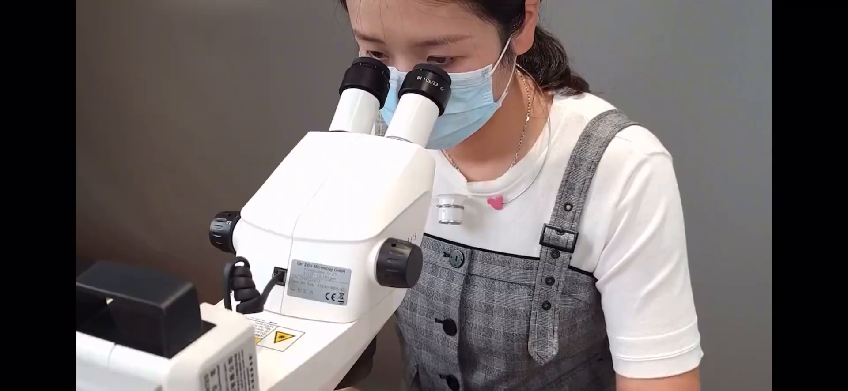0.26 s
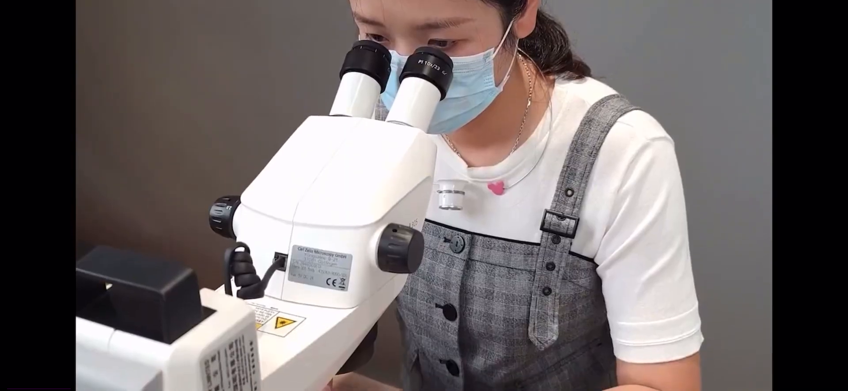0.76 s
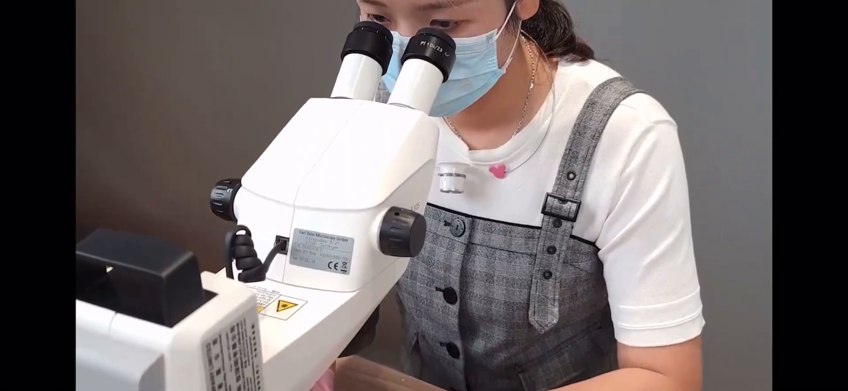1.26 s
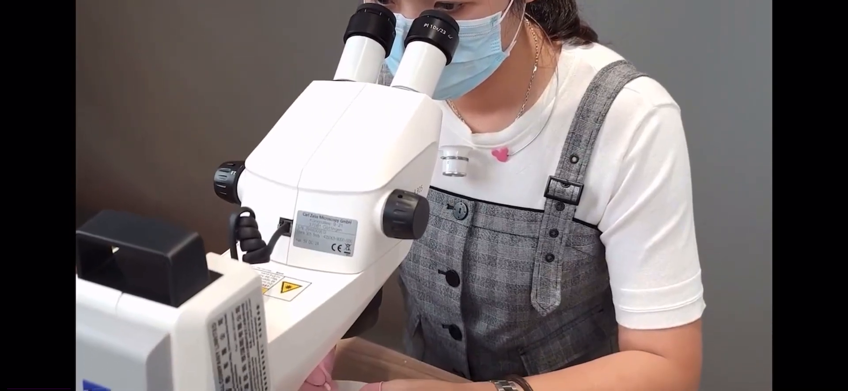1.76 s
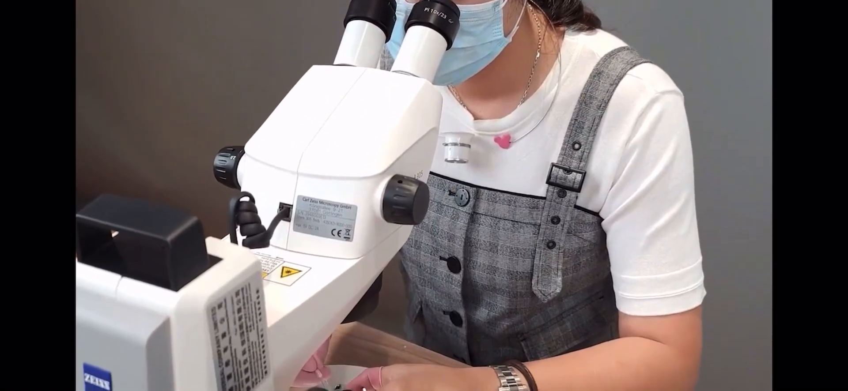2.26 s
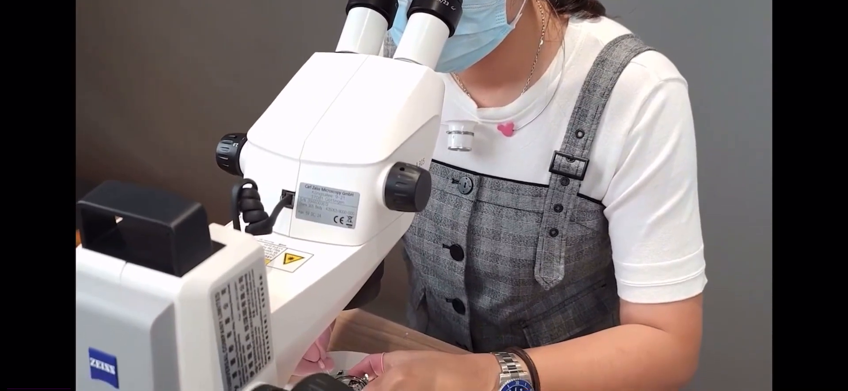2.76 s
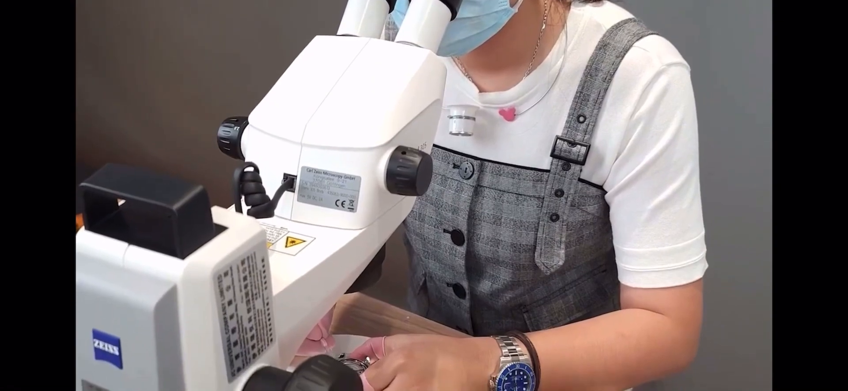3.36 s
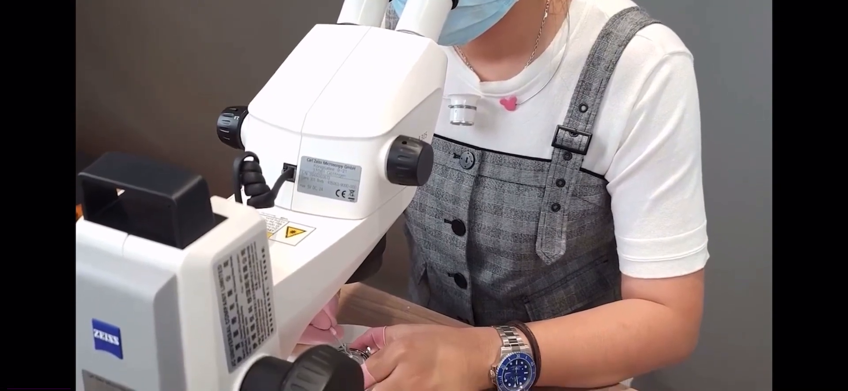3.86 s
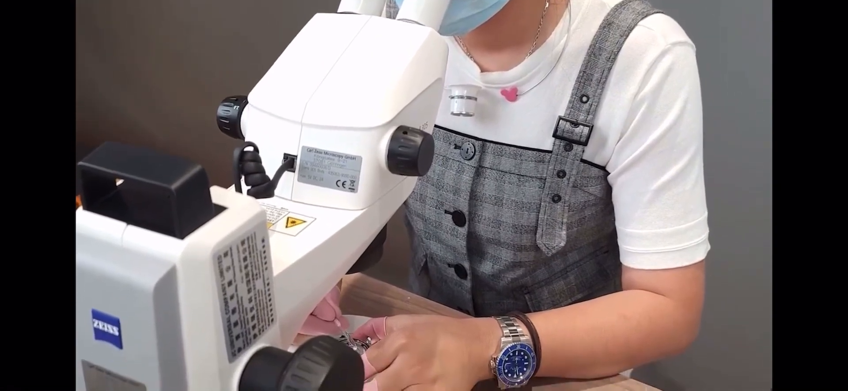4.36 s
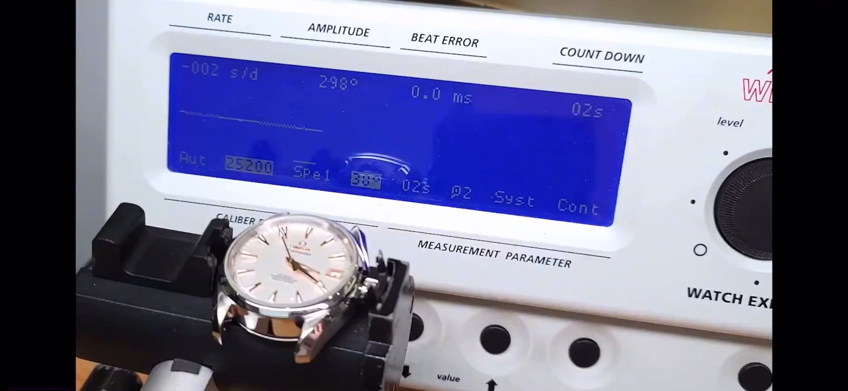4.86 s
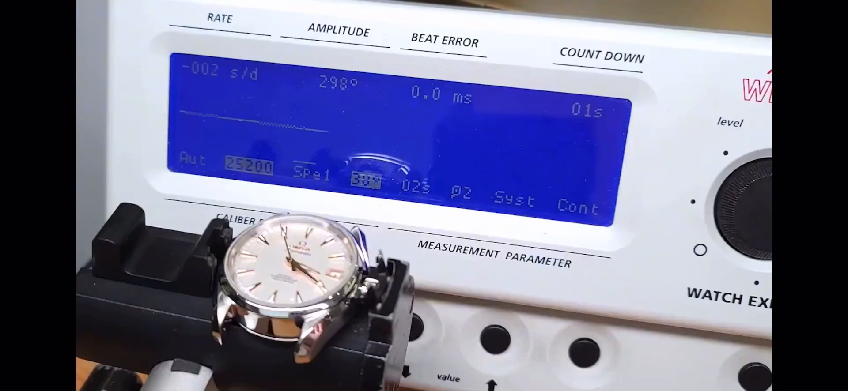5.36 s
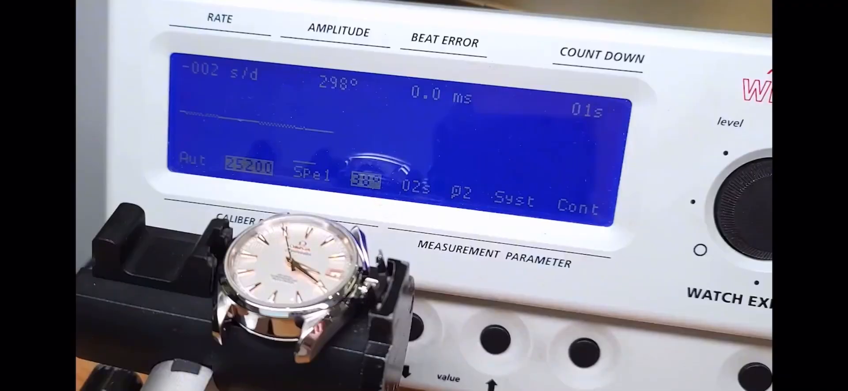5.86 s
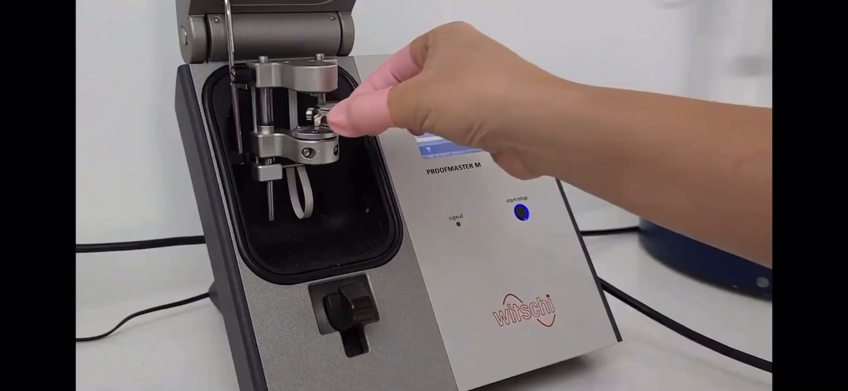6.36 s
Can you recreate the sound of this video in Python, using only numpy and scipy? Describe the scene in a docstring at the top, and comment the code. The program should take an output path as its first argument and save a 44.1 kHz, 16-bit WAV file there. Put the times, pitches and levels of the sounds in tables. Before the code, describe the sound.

A quiet bed of night insects and low rumble, in wide stereo. A close cricket in the centre gives several crisp chirps in the second and third seconds, while fainter ones keep pulsing on the left. Then much louder, steady rapid watch ticks, high, hard and uneven in strength, play from a loudspeaker in a reverberant workshop. They cut out suddenly, leaving crickets, airy hush and small metal contacts.

```python
"""Crickets sing throughout over low rumble; late on, a watch ticks seven times a second, then small clicks.
The mechanical watch sounds through the loudspeaker of a timing machine in a workshop: each beat is a
cluster of steel-on-jewel blows that ring damped case modes, followed by reflections and reverberation.
The close chirper and four farther ones are trains of wing strokes; a low trill and thin tones are wavering
sines. A distant chorus, the night's rumble and hiss and the room's air are noise; soft low blips are added."""
import sys
import numpy as np
from scipy import signal
from scipy.fft import rfft, irfft, next_fast_len
from scipy.io import wavfile
from scipy.ndimage import uniform_filter1d, map_coordinates

SR = 44100
rng = np.random.default_rng(int(sys.argv[2]) if len(sys.argv) > 2 else 0)


def log_audio(samples):
    """Write samples as a 16-bit WAV file to the path given in sys.argv[1]."""
    # one column per channel
    frames = np.atleast_2d(samples).T
    # limit to full scale, then quantise
    limited = np.clip(frames, -1, 1)
    pcm = np.round(limited * 32767).astype(np.int16)
    wavfile.write(sys.argv[1], SR, pcm)


def volts(x):
    """Linear amplitude factor 10**(x/20) for a level x in dB, scalar or array-like."""
    e = np.asarray(x, float) / 20
    return 10 ** e


N = 291060  # length in samples

# beat just before the watch is heard, whose reverberation is still dying then: start_s, level_db
EARLIER_BEAT = (4.516, -5.5)
# drop of the escape wheel and its rebound:
# start_s, level_db, rebound_after_ms, rebound_level_db, low_modes_db
DROPS = [(4.658, -16.5, 1.7, -16, -2), (4.801, -8.5, 1.7, -14.5, 1), (4.943, -17, 1.4, -13, 4),
         (5.0861, -11.5, 1.8, -15, 0.8), (5.2297, -14.5, 1.2, -15.5, 2.5), (5.3722, -8.5, 2.1, -12.5, -4.5),
         (5.516, -5, .9, -15, -8.5), (5.6573, -14.5, 2.2, -11, -2.5), (5.8019, -11.5, 1.4, -22.5, 2.5),
         (5.9432, -11.5, 1.7, -10, -1.3), (6.0865, -14.5, 1.01, -13.5, 3.5), (6.2288, -7.5, 1.7, -13, 2.5)]
LOW_MODES_HZ = 6600  # modes under this ring more in some beats and less in others


def watch():
    """Superposition: each beat sounds direct, off the bench and through the room, in the stretch it is heard."""
    # stretch in which the watch is heard: start_s, end_s
    watch_heard = (4.568, 6.337)
    low_in_room = 0.8  # share of the low-mode change that reaches the room
    direct, blows, spread = np.zeros(N), np.zeros(N), np.zeros((2, N))
    for s, level_db, low_db in contacts():
        add(direct, s - 0.0002, contact(level_db + 2.0, low_db))
        blows[round(s * SR)] = volts(0.91 * level_db)  # the room grows less than the direct click

    step = SR // 7  # one beat
    first = round(EARLIER_BEAT[0] * SR) - step // 4
    for k, low_db in enumerate([0, *np.transpose(DROPS)[-1]]):
        start = first + k * step
        beat = slice(start, start + step)
        add(spread, start / SR + 0.0035, volts(3.5) * room(blows[beat], low_in_room * low_db))
        add(spread, start / SR, click_width(direct[beat]))
        add(spread, start / SR + 0.0006, volts(-13.5) * bench(direct[beat]))

    t = np.arange(N) / SR
    to_edge_s = np.minimum(t - watch_heard[0], watch_heard[1] - t)
    gate = np.clip(to_edge_s / 0.0015, 0, 1)
    return gate * (direct + spread)


def contacts():
    """An isochronous balance: rows (s, dB, low modes dB) of lead-ins on the even beat, drops, rebounds, bounces."""
    # small contacts ahead of each beat, unlocking and impulse: from_even_beat_ms, level_db
    lead_ins = [(-5, -28.5), (-3.1, -27), (-2.6, -32.5)]
    # bounces, timed from the drop: after_drop_ms, relative_to_rebound_db
    bounces = [(3.4, -5), (5.2, -18.5)]
    beat_s, first_beat_s = 1 / 7, 4.6578  # the balance swings evenly
    loose_ms, loose_db = 0.5, 2  # scatter of the small contacts
    firm, small = [(*EARLIER_BEAT, 0)], []
    for k, (s, level_db, after_ms, rebound_db, low_db) in enumerate(DROPS):
        firm.append((s, level_db, low_db))
        firm.append((s + after_ms / 1000, rebound_db, low_db))
        even_s = first_beat_s + k * beat_s
        small += [(even_s + ms / 1000, lead_db, 0) for ms, lead_db in lead_ins]
        small += [(s + ms / 1000, rebound_db + rel_db, low_db) for ms, rel_db in bounces]
    scatter = rng.standard_normal((len(small), 3)) * [loose_ms / 1000, loose_db, loose_db]
    return [*firm, *(np.array(small) + scatter)]


def contact(peak_db, low_db):
    """Modal synthesis: a steel-on-jewel blow swells in and rings damped case modes at new strengths."""
    # watch case, pickup and loudspeaker: frequency_hz, width_hz, mode_level_db
    case_modes = [(5453, 100, -15), (5475, 240, -6), (5870, 180, -9.5), (6350, 230, -19), (7200, 270, -17),
                  (7580, 290, -2.5), (7980, 450, 1.5), (8640, 300, -3.5), (9180, 450, -16),
                  (9990, 110, -9.5), (10000, 200, -20.5), (10810, 230, -11.5), (11670, 520, -7.5),
                  (12100, 270, -8.5), (14520, 180, -9.5), (15400, 250, -44)]
    t = np.arange(1024) / SR
    hz, width, mode_db = np.transpose(case_modes)[..., None]
    luck = rng.standard_normal((2, len(case_modes), 1))
    strength = width * volts(mode_db + low_db * (hz < LOW_MODES_HZ) + 2.3 * luck[0])
    decay = np.exp(-np.pi * width * t)  # a wider resonance dies faster
    modes = strength * decay * np.sin(2 * np.pi * hz * t + 1.84 * luck[1])
    swell = 1 - np.exp(-(t / 0.00053) ** 2)
    ring = modes.sum(axis=0) * swell
    # loudspeaker band
    ring = filtered(ring, lambda f: 1 / (1 + (4500 / (f + 1)) ** 10) / (1 + (f / 15600) ** 40))
    return volts(peak_db) * ring / np.abs(signal.hilbert(ring)).max()


def bench(direct):
    """Early reflection: chatter and near reflections are a short noise tail, largely alike on both sides."""
    t = np.arange(SR // 16) / SR
    noise = rng.standard_normal(len(t)) + 0.41 * rng.standard_normal((2, len(t)))
    tail = noise * volts(-60 * t / 0.031)
    return signal.fftconvolve(direct[None], tail / np.linalg.norm(tail[0]), axes=1)


def click_width(direct):
    """Stereo width: a very short noise tail in opposite phase makes the two sides of each click unlike."""
    # strength of the unlike part: frequency_hz, level_db
    unlike_part = [(5500, -11), (6900, -19), (9000, -19), (10500, -13), (12500, -11), (15000, -9.5)]
    t = np.arange(SR // 16) / SR
    tail = rng.standard_normal(len(t)) * volts(-60 * t / 0.003)
    unlike = signal.fftconvolve(direct, tail / np.linalg.norm(tail))
    return filtered(unlike, lambda hz: volts(along(unlike_part, hz))) * [[1], [-1]]


def room(blows, low_db):
    """Reverberation: a new noise tail dies band by band, with random uneven patches in time and frequency."""
    # smooth colour of the sound the loudspeaker spreads through the room: frequency_hz, density_db_per_hz
    spread_colour = [(4300, -50), (4900, -10), (5600, 1), (6100, -4), (6700, -9), (7600, 1), (8600, -4),
                     (9600, -10.5), (11500, -12.5), (13000, -15), (13700, -16.5), (14400, -15),
                     (14800, -29), (15100, -62.5)]
    # reverberation time: frequency_hz, t60_s
    decay_times = [(5000, 0.37), (8000, 0.64), (14000, 0.87)]
    hz, t, bands = signal.stft(rng.standard_normal((3, SR // 2)), SR, nperseg=256)
    patches = uniform_filter1d(rng.standard_normal(bands.shape[1:]), size=6, axis=0)
    patches = uniform_filter1d(patches, size=3, axis=1)
    colour_db = along(spread_colour, hz) + low_db * (hz < LOW_MODES_HZ)
    decay_db = -60 * t / along(decay_times, hz)[:, None]
    level_db = colour_db[:, None] + 2.4 * unit(patches) + decay_db
    tail = signal.istft(bands * volts(level_db), SR, nperseg=256)[1]
    tail = tail[:2] + 0.79 * tail[2]  # partly alike on both sides
    return signal.fftconvolve(blows[None], tail / np.linalg.norm(tail[0]), axes=1)


def near_cricket():
    """Stridulation close by, straight ahead: a full chirp starts weak and flat, then its strokes slow down."""
    # chirps, timed at the centre of the first stroke: start_s, strokes, level_db
    close_chirps = [(1.7536, 8, -30), (2.0334, 8, -30), (2.3136, 8, -30), (2.5975, 8, -30),
                    (3.0783, 5, -31), (3.1503, 1, -29.5), (3.1711, 1, -26)]
    gap_ms, gap_grows_ms = 13.5, 0.68  # first gap between strokes; each next one is longer
    stroke_ms, stroke_grows_ms = 6.24, 0.3  # nominal; strokes lengthen too
    settled_hz, cold_hz, cold_db = 4935, 70, 3.5  # nominal pitch; how flat and weak the first stroke is
    warming = 0.23  # share of that flatness and weakness left a stroke later
    out, k = np.zeros(N), np.arange(8)
    at_ms = gap_ms * k + gap_grows_ms * k * (k - 1) / 2
    pattern = np.transpose([at_ms, -cold_db * warming ** k, settled_hz - cold_hz * warming ** k])
    for s, db, hz, place in chirps(close_chirps, pattern, loose_ms=0.25, loose_db=0.26, loose_hz=15):
        ms = stroke_ms + stroke_grows_ms * place
        tone = volts(db) * stroke(ms, hz, fall_hz=340, blunt=0.51, overtone_db=-29.0)
        add(out, s - len(tone) / SR / 2, tone)
    return out + volts(-22) * outdoors(out, t60=0.1)


def chirping_crickets():
    """Stridulation farther off: a faint neighbour of the close one, two on the left and a deeper one."""
    # chirps, timed at the first place of the pattern: start_s, strokes, level_db
    neighbour_chirps = [(1.666, 5, -50.5), (1.947, 6, -52.5), (2.3, 1, -49), (2.536, 2.5, -53),
                        (2.921, 1, -50.5), (3.189, 4, -49.5)]
    left_chirps = [(.073, 4, -53.5), (.395, 4, -54.5), (.683, 4, -54.5), (1.037, 4, -54.5),
                   (1.345, 4, -53.5), (1.672, 4, -52), (1.927, 4, -53.5), (2.244, 4, -52.5),
                   (2.546, 4, -53.5), (2.867, 4, -53), (3.168, 4, -51.5), (3.452, 4, -54), (3.755, 4, -52),
                   (4.041, 4, -53.5), (4.36, 4, -53), (4.74, 4, -55), (5.053, 4, -54), (5.354, 4, -52.5),
                   (5.717, 4, -51.5), (6.099, 4, -55.5), (6.381, 4, -55.5)]
    slower_chirps = [(.169, 2, -57), (.484, 5, -57.5), (.87, 4, -58.5), (1.222, 4, -57.5), (1.564, 3, -58),
                     (2.43, 2, -58), (2.721, 4, -57), (3.407, 4, -66), (3.863, 2, -55.5), (4.119, 4, -56.5),
                     (4.526, 5, -58), (4.971, 3, -57), (5.284, 3, -56), (5.66, 2, -60), (6.23, 2, -54.5),
                     (6.502, 3, -56.5)]
    deep_chirps = [(1.907, 3, -61), (2.356, 3, -57), (3.004, 2, -55)]
    # strokes of one chirp: after_start_ms, relative_db, nominal_pitch_hz
    left_pattern = [(0, -6.5, 4420), (25.1, -1.5, 4490), (58.4, 0.3, 4515), (94.7, -.5, 4505)]
    slower_pattern = [(0, -6.5, 4340), (33, -1.5, 4390), (73, -0.5, 4430), (115, -0.7, 4450),
                      (157, -.1, 4440)]
    deep_pattern = [(0, 1.5, 3700), (50, 3.5, 3705), (99, 4, 3725)]
    even_pattern = [(17 * k, 0, 4830) for k in range(6)]
    neighbour = chirps(neighbour_chirps, even_pattern, loose_ms=2.5, loose_db=1.5, loose_hz=45)
    quick = chirps(left_chirps, left_pattern, loose_ms=1.2, loose_db=1.0, loose_hz=25)
    slower = chirps(slower_chirps, slower_pattern, loose_ms=1.2, loose_db=1.0, loose_hz=30)
    left = np.vstack([quick, slower])
    deep = chirps(deep_chirps, deep_pattern, loose_ms=0.69, loose_db=1.0, loose_hz=9)
    return (singer(neighbour, ms=8.6, fall_hz=300, pan_db=0, lag_s=0, echo_db=-4.0)
            + singer(left, ms=10.5, fall_hz=620, pan_db=11.5, lag_s=-0.0009, echo_db=-6)
            + singer(deep, ms=10.4, fall_hz=220, pan_db=-1, lag_s=0, echo_db=-4))


def singer(rows, ms, fall_hz, pan_db, lag_s, echo_db):
    """Stereo placement by level and time difference between the sides, blurred by echoes."""
    out = np.zeros(N)
    for s, db, hz, _ in rows:
        tone = volts(db - 1.5) * stroke(ms, hz, fall_hz, blunt=0.55, overtone_db=-24.5, wing_hz=600)
        add(out, s - len(tone) / SR / 2, tone)
    right = np.roll(out, round(lag_s * SR))
    sides = np.array([volts(pan_db / 2) * out, volts(-pan_db / 2) * right])
    return sides + volts(echo_db) * outdoors(out, t60=0.15)


def chirps(rows, pattern, loose_ms, loose_db, loose_hz):
    """Pulse trains: each chirp plays the start of a pattern loosely; gives rows (s, dB, Hz, place in chirp)."""
    plain = []
    for s, strokes, db in rows:
        for k, (ms, rel_db, hz) in enumerate(pattern[:round(strokes)]):
            plain.append((s + ms / 1000, db + rel_db, hz, k))
    plain = np.array(plain)
    return plain + rng.standard_normal(plain.shape) * [loose_ms / 1000, loose_db, loose_hz, 0]


def stroke(ms, hz, fall_hz, blunt, overtone_db, wing_hz=250):
    """Driven resonance: in a wing stroke, 1.5 ms-values long, the tooth rate sags off the wing's resonance."""
    u = np.linspace(0, 1, round(1.5 * ms * SR / 1000))
    sag = fall_hz * u ** 5
    phase = 2 * np.pi * np.cumsum(hz + 0.051 * fall_hz - sag) / SR + rng.uniform(0, 2 * np.pi)
    shape = np.abs(np.sin(np.pi * u))
    teeth_db = rng.normal(0, 0.7, size=6)  # teeth differ
    uneven = volts(np.interp(u, np.linspace(0, 1, num=6), teeth_db))
    tone = shape ** blunt * np.sin(phase) / (1 + (sag / wing_hz) ** 2)
    overtone = volts(overtone_db + 8.6 * u) * shape ** 0.5 * np.sin(2 * phase)
    return uneven * (tone + overtone)


def outdoors(x, t60):
    """Diffuse scattering: a short noise echo of the surroundings, different on each side."""
    t = np.arange(SR // 5) / SR
    echo = rng.standard_normal((2, len(t))) * volts(-60 * t / t60)
    return signal.fftconvolve(x[None], echo / np.linalg.norm(echo[0]), axes=1)[:, :N]


def low_trill():
    """Amplitude modulation: a wavering sine pulses at the stroke rate, a little louder on the right."""
    # pitch_hz, strokes_per_s, time_of_a_stroke_peak_s, level_db (before the gains of the sides)
    trill_settings = (2899, 33, 3, -72.5)
    hz, rate, peak_s, db = trill_settings
    t = np.arange(N) / SR
    beat = (0.5 + 0.5 * np.cos(2 * np.pi * rate * (t - peak_s))) ** 1.1
    phase = 2 * np.pi * np.cumsum(hz + 35 * wobble(90)) / SR
    tone = unit(beat * np.sin(phase)) * volts(db + 2.3 * wobble(25))
    return np.array([volts(-4.5) * np.roll(tone, -17), volts(-3.0) * tone])


def thin_tones():
    """Pure tones: sines of steady pitch whose levels waver."""
    # pitch_hz, rms_level_db (about which it wavers)
    whines = [(215, -63), (9599, -89.5), (9627, -88)]
    t = np.arange(N) / SR
    return sum(np.sqrt(2) * volts(db + 3.2 * wobble(6)) * np.sin(2 * np.pi * hz * t) for hz, db in whines)


def distant_chorus():
    """Incoherent summation: singers too dense to count become band noise that flutters, thickens and thins."""
    # frequency_hz, density_db_per_hz
    chorus_colour = [(3900, -90), (4150, -38.5), (4500, -8), (4900, -4), (5150, 1), (5600, -2.5),
                     (6000, -11), (6400, -15.5), (6700, -88)]
    # time_s, level_db
    crowd_levels = [(0, -59.5), (.8, -61.5), (1.6, -61.5), (1.7, -57), (2.3, -57.5), (2.8, -58),
                    (3.25, -59), (3.4, -60), (4.5, -60), (6.6, -59.5)]
    t = np.arange(N) / SR
    flutter_db = 2.25 * np.array([wobble(70), wobble(70)]) + 1.2 * wobble(2.89)
    band = unit(volts(flutter_db) * rush(chorus_colour, [(5000, 0.13)]))
    return volts(np.interp(t, *np.transpose(crowd_levels))) * band


def blips():
    """Short tone bursts: soft rounded low notes from either side, whose pitch sags at the end."""
    # timed at the centre of each note: time_s, level_db, nominal_pitch_hz, left_minus_right_db
    low_notes = [(4.641, -59, 784, 14), (4.905, -60.5, 884, 13), (5.248, -62, 589, -3),
                 (5.543, -57.5, 680, -15)]
    out = np.zeros((2, N))
    for s, db, hz, pan_db in low_notes:
        tone = stroke(22, hz, fall_hz=200, blunt=1.2, overtone_db=-40.5)
        add(out, s - len(tone) / SR / 2, tone * volts([[db + pan_db / 2], [db - pan_db / 2]]))
    return out


def handling():
    """Impact noise: light contacts of metal parts are bright noise with a fast exponential decay."""
    # start_s, starting_level_db (before the colour and the sum of noises), t60_s
    bright_clicks = [(6.501, -54, .03), (6.521, -48, 0.095)]
    colour = [(2500, -27), (5000, -5.0), (9000, -3.0), (15000, -4), (16000, -40)]  # (Hz, dB)
    out, t = np.zeros((2, N)), np.arange(SR // 10) / SR
    for s, db, t60 in bright_clicks:
        noise = rng.standard_normal(len(t)) + 1.42 * rng.standard_normal((2, len(t)))
        add(out, s, volts(db - 60 * t / t60) * noise)
    return filtered(out, lambda hz: volts(along(colour, hz)))


def background():
    """Stereo balance: night and room air together lean right over most of the spectrum."""
    # frequency_hz, left_minus_right_db
    side_balance = [(60, 1), (130, -.5), (290, -2.5), (640, -2), (1400, -0.5), (7000, -2.5)]
    both = night() + room_air()
    return filtered(both, lambda hz: volts(along(side_balance, hz) * np.array([[0.5], [-0.5]])))


def night():
    """Coloured noise: night rumble and hiss, slightly uneven in level, with coherence set by frequency."""
    # frequency_hz, density_db_per_hz
    night_colour = [(12, -54.5), (20, -17), (32, -15), (45, -9), (75, -0.5), (170, -11), (216, -13),
                    (245, -17), (390, -23.5), (520, -29), (1000, -36), (2000, -39), (4000, -46),
                    (6700, -49.5), (8000, -42.5), (8600, -47.5), (13600, -53.5), (13800, -100.5),
                    (16000, -110)]
    # likeness of the two sides: frequency_hz, correlation
    night_likeness = [(60, 0.95), (150, 0.98), (380, 0.87), (950, 0.16), (2380, 0.052), (5980, 0.57),
                      (15000, 0.0072)]
    return volts(-45 + 0.47 * wobble(2.6)) * rush(night_colour, night_likeness)


def room_air():
    """Coloured noise: the air noise of the room, gated to two stretches of time."""
    # frequency_hz, density_db_per_hz
    air_colour = [(200, -59), (300, -39), (600, 1.5), (1100, 2), (2000, -3), (4000, -10.5), (8000, -42),
                  (13600, -23), (13800, -81)]
    # stretches in which it is heard: start_s, end_s, level_db
    air_times = [(.33, 4.56, -63), (6.337, 6.62, -59.5)]
    t = np.arange(N) / SR
    level = np.zeros(N)
    for start, end, db in air_times:
        level += volts(db) * np.clip(np.minimum(t - start, end - t) / 0.006, 0, 1)
    return level * rush(air_colour, [(500, 1.0), (1500, -0.38), (8000, 0.57)])


def rush(spectrum, alike):
    """Partial coherence: stereo noise of rms 1; the mid/side mix sets how alike the sides are."""
    def turn(hz):
        return np.arccos(np.clip(along(alike, hz), -1, 1)) / 2

    def response(hz):
        return volts(along(spectrum, hz)) * [np.cos(turn(hz)), np.sin(turn(hz))]

    mid, side = filtered(rng.standard_normal((2, N)), response)
    return unit(np.array([mid + side, mid - side]))


def filtered(x, response):
    """Linear filtering: the spectrum of x times a response of frequency."""
    n = x.shape[-1]
    m = next_fast_len(n + 4096)
    return irfft(rfft(x, m) * response(np.fft.rfftfreq(m, 1 / SR)), m)[..., :n]


def wobble(rate):
    """Slow modulation: a smooth random curve, rate knots a second."""
    knots = rng.standard_normal(int(N * rate / SR) + 4)
    return map_coordinates(knots, [np.arange(N) * rate / SR])


def along(points, hz):
    """Logarithmic frequency scale: interpolates (Hz, value) points."""
    f, v = np.transpose(points)
    return np.interp(np.log(hz + 1), np.log(f + 1), v)


def unit(x):
    """Normalisation by mean power: x scaled to rms 1."""
    return x / np.sqrt(np.mean(x ** 2) + 1e-20)


def add(track, s, sound):
    """Superposition: mixes a sound into the track at time s."""
    part = track[..., round(s * SR):][..., :sound.shape[-1]]
    part += sound[..., :part.shape[-1]]


def scene():
    """Superposition of all sources at the two microphones."""
    crickets = near_cricket() + chirping_crickets() + low_trill() + thin_tones() + distant_chorus()
    return watch() + crickets + blips() + handling() + background()


def band_limit(x):
    """A steep low-pass at the top of the band."""
    return signal.sosfilt(signal.butter(12, 16430, fs=SR, output="sos"), x)


def record(dry):
    """Signal chain: the finished mix goes through its last stage."""
    return band_limit(dry)


dry = scene()
out = record(dry)
log_audio(out)
```